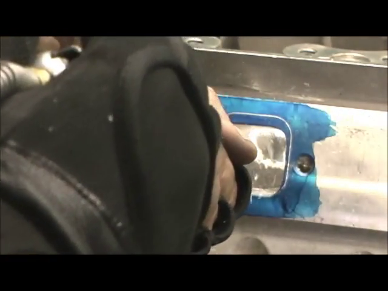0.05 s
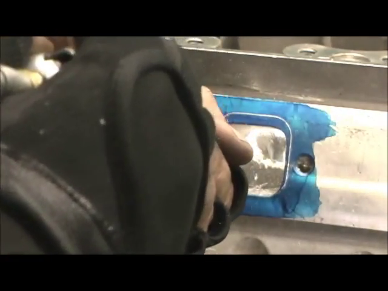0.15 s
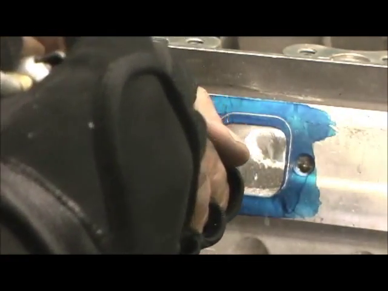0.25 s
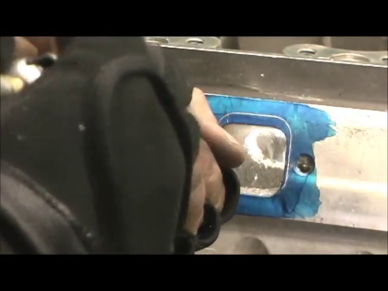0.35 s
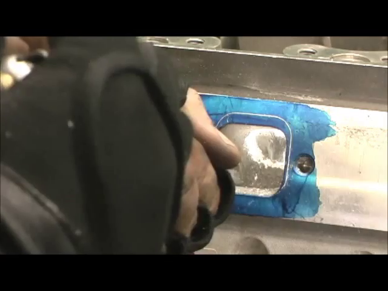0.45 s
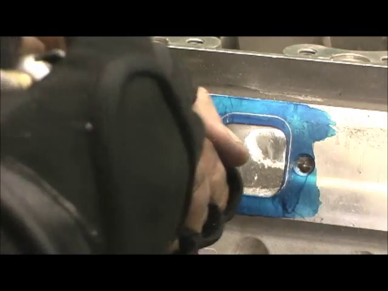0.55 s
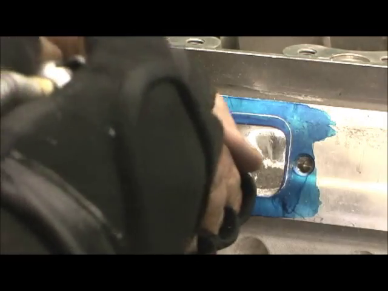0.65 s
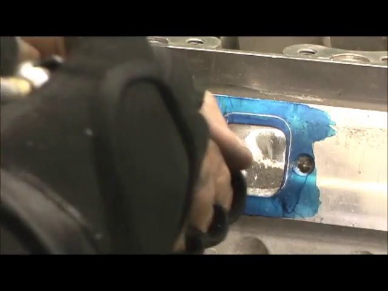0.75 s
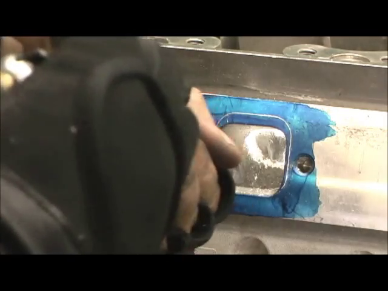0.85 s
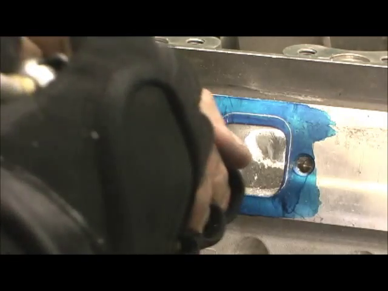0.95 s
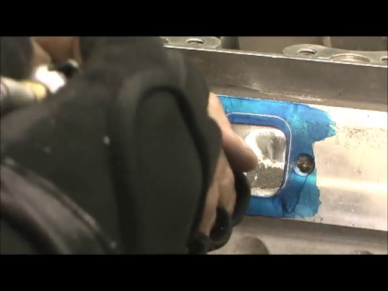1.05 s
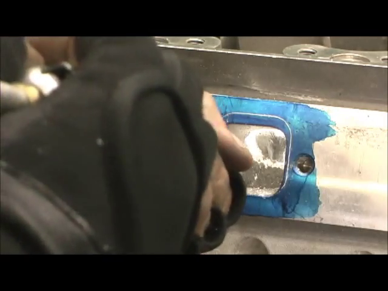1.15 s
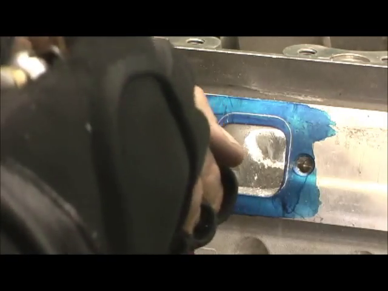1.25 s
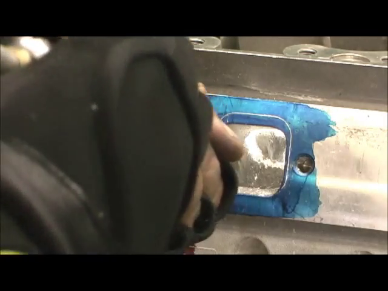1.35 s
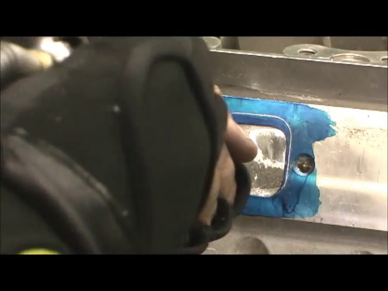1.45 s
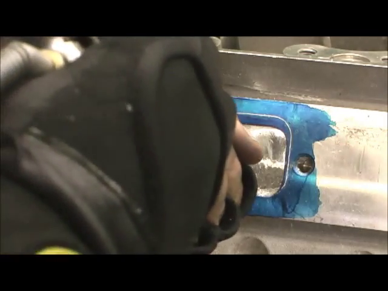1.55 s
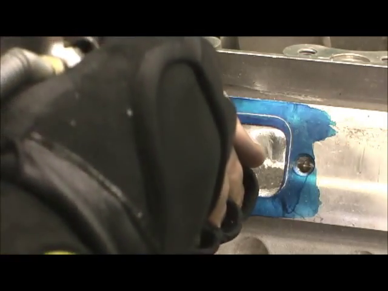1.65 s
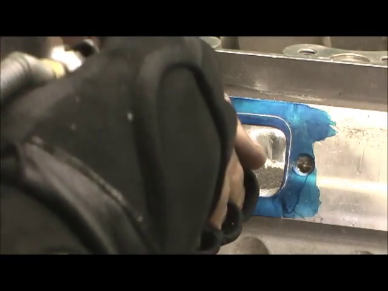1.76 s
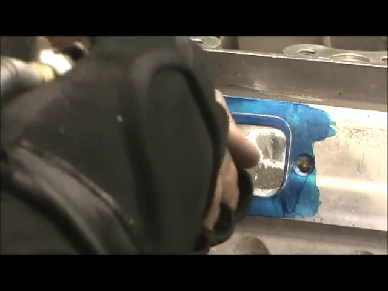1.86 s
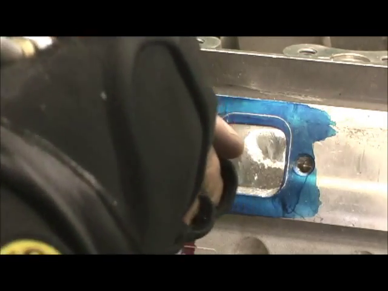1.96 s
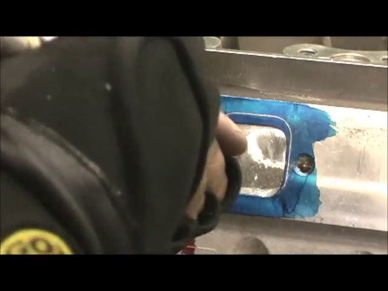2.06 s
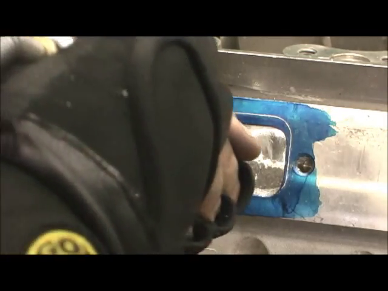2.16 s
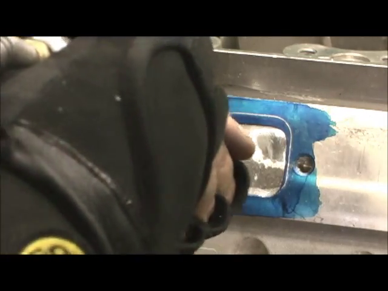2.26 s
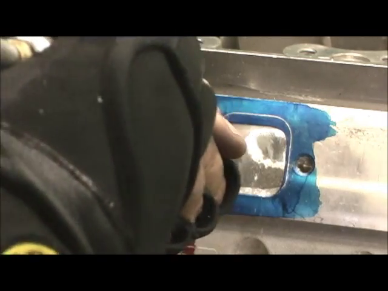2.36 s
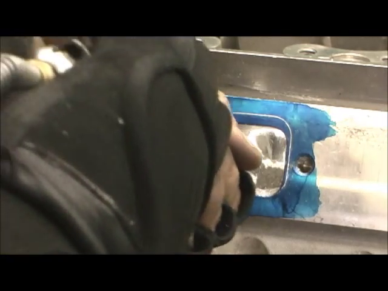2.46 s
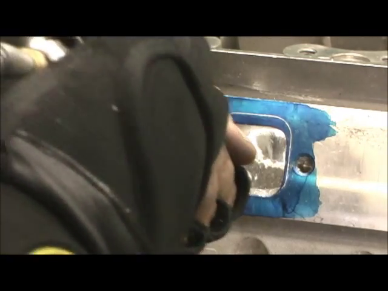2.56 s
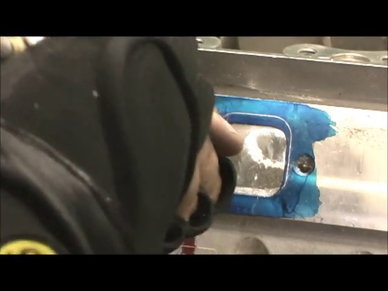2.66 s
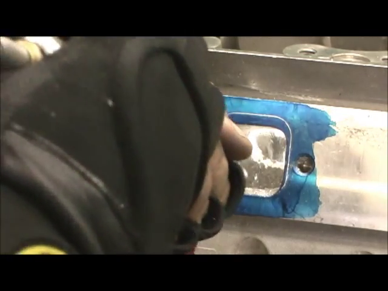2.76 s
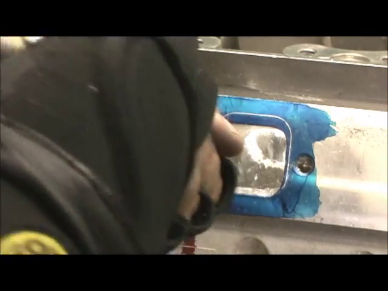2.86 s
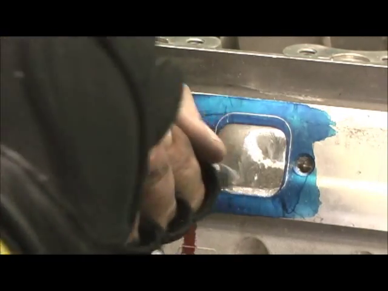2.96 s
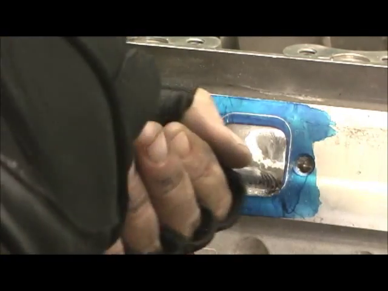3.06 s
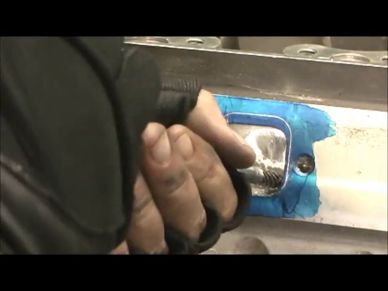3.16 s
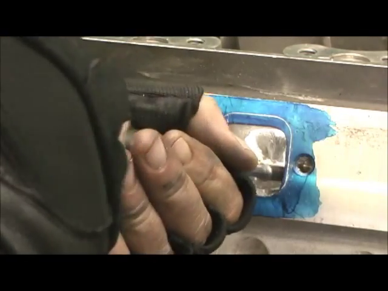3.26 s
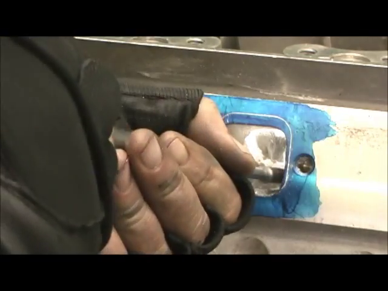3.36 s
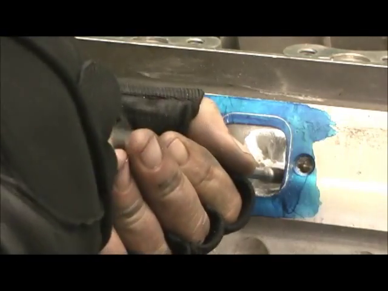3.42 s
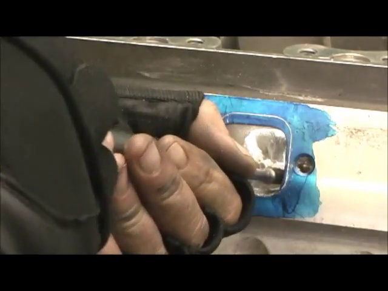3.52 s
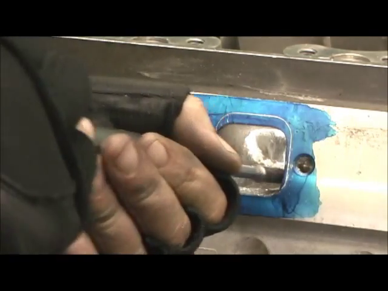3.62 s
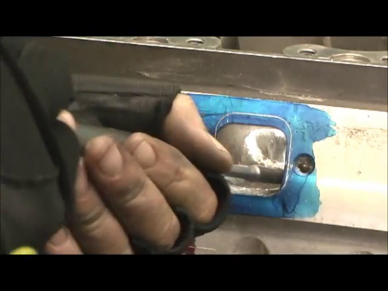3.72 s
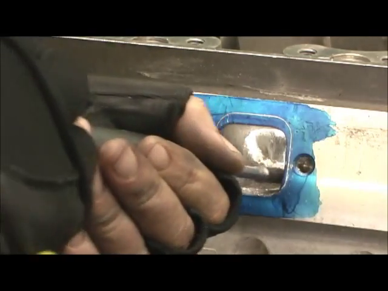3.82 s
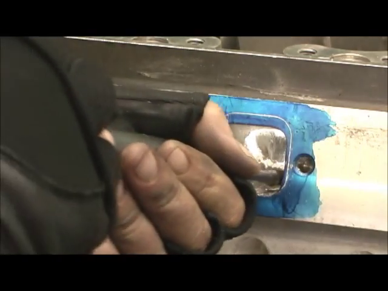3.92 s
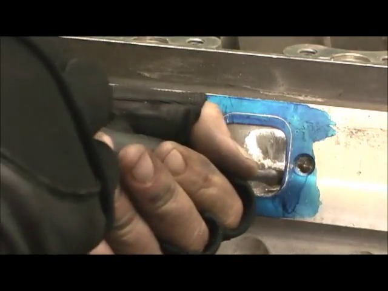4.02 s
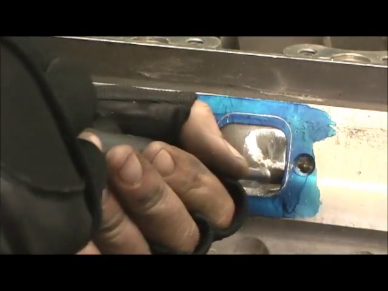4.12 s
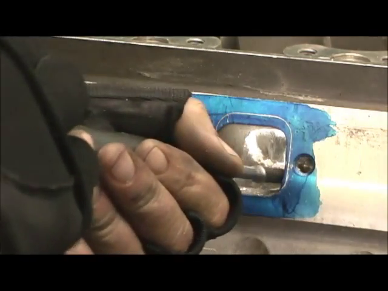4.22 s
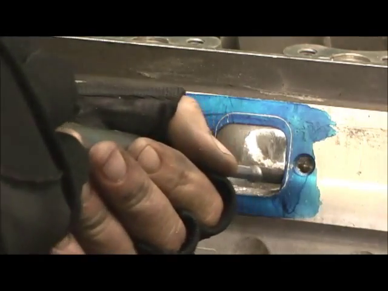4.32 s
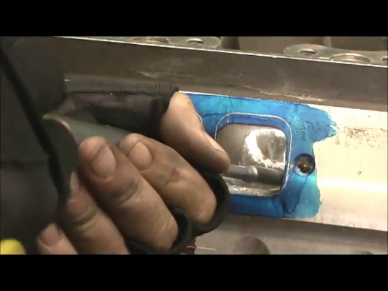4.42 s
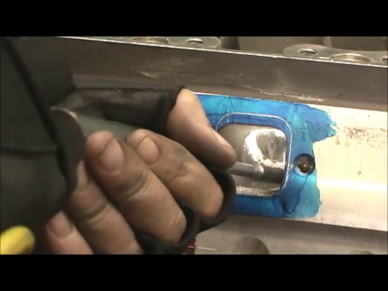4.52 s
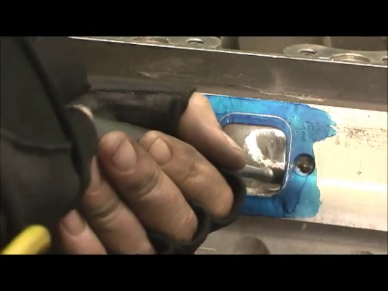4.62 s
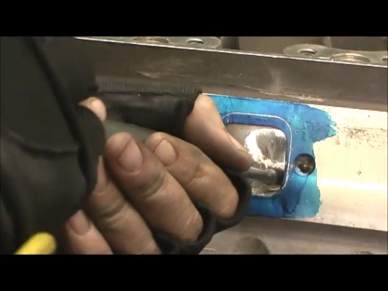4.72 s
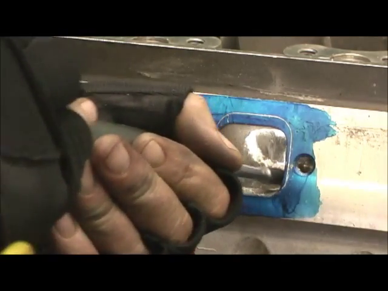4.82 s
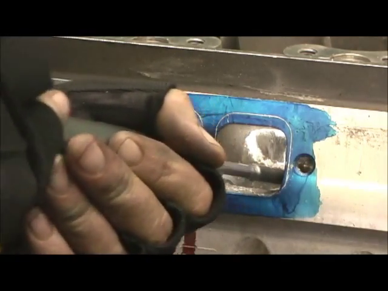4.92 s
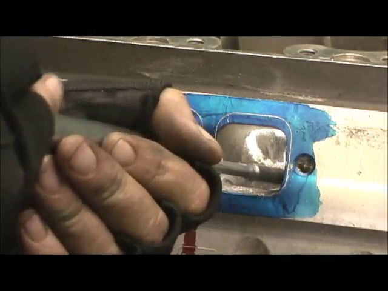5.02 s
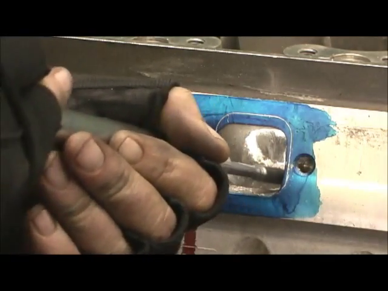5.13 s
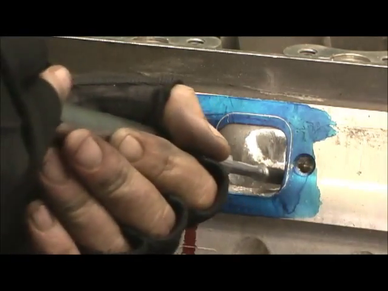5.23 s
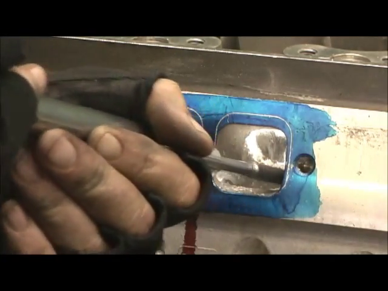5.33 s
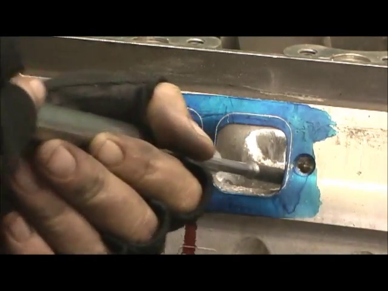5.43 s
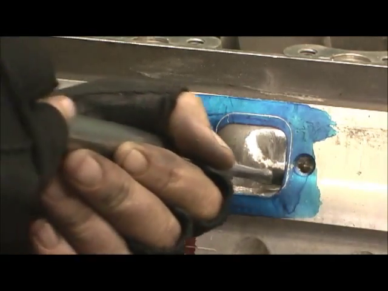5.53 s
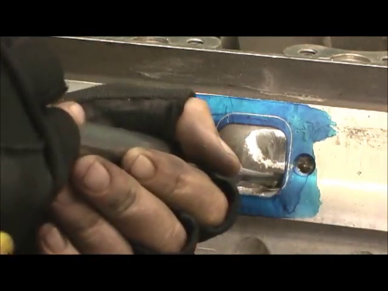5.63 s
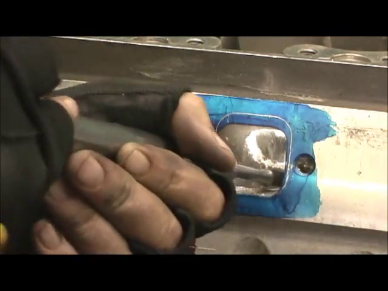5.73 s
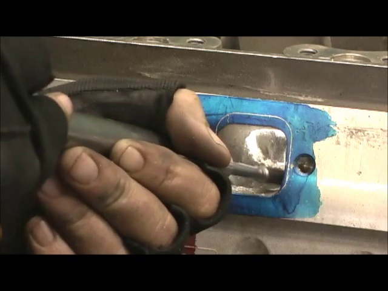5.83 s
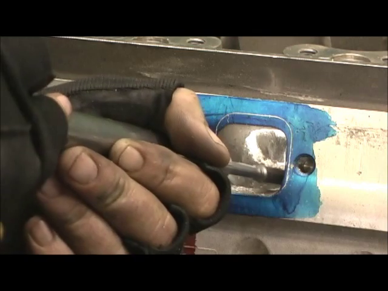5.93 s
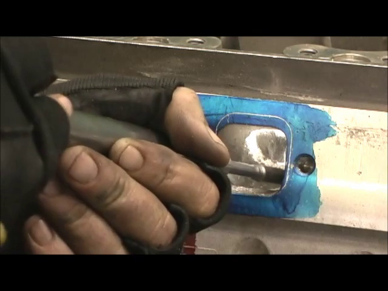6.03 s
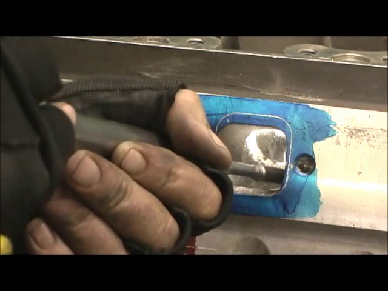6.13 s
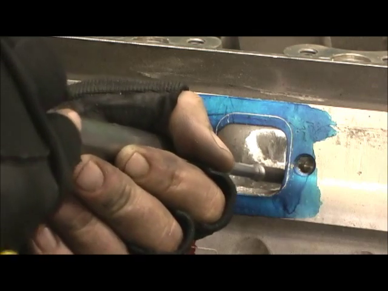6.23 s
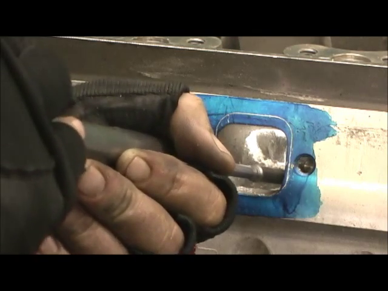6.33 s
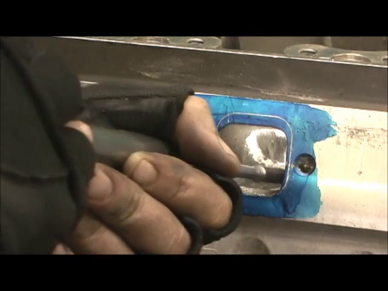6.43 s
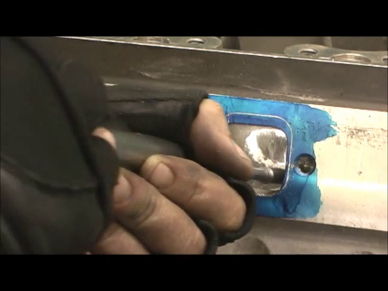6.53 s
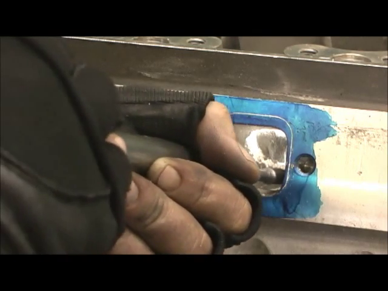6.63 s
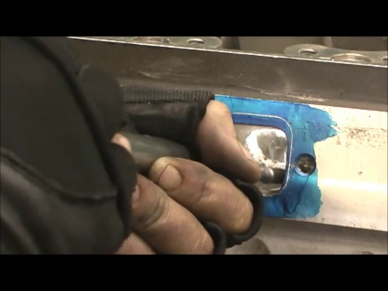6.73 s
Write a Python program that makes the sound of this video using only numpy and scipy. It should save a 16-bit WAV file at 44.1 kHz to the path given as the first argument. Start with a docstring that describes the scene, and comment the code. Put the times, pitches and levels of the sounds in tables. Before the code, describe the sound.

A handheld air grinder carves metal with a wavering whine, hiss and gritty chatter, cutting out for a moment and restarting.

```python
"""In a workshop, a five-vane air grinder cuts aluminium inside a heavy casting.
The shaft and vanes sing at a speed that sags under load. The burr throws crackling chips, its chatter
rings the modes of the casting, and the turbulent exhaust hisses. Near 3 s the tool stalls, winds down
and spins up again in a new grip. A machine hums far off, and a low rumble comes and goes."""
import sys
import numpy as np
from scipy import signal
from scipy.fft import rfft, irfft, next_fast_len
from scipy.io import wavfile

SR = 44100
rng = np.random.default_rng(int(sys.argv[2]) if len(sys.argv) > 2 else 0)


def generate_wav(sig):
    """Save sig (samples, or channels by samples) to the path in sys.argv[1] as 16-bit PCM at SR."""
    pcm = np.round(np.clip(np.atleast_2d(sig).T, -1, 1) * 32767).astype(np.int16)
    wavfile.write(sys.argv[1], SR, pcm)


N = 298998
TIME = np.arange(N) / SR
PAD = next_fast_len(N + SR)
BIN_HZ = np.maximum(np.arange(PAD // 2 + 1) * SR / PAD, 1)
VANES = 5
STALL_S, REGRIP_S, VALVE_CRACK_S, SPIN_UP_S, FULL_AIR_S = 2.887, 3.1, 3.245, 3.249, 3.256


def from_db(db):
    """Amplitude ratio of a level in decibels."""
    return 10 ** (np.asarray(db) / 20)


def rms_one(x):
    """Normalisation to unit rms."""
    return x / np.sqrt(np.mean(x ** 2) + 1e-20)


def in_time(rows):
    """Linear interpolation of timed rows: one curve for each column after the first."""
    times, *columns = np.transpose(rows)
    return [np.interp(TIME, times, column) for column in columns]


def over_bins(points):
    """Interpolation in log frequency, giving a value at every FFT bin."""
    hz, value = np.transpose(points)
    return np.interp(np.log(BIN_HZ), np.log(hz), value)


def coloured(x, spectrum):
    """Spectral shaping of a broadband signal, at unit rms."""
    return rms_one(irfft(rfft(x, PAD) * from_db(over_bins(spectrum)), PAD)[..., :N])


def drift(rate_hz):
    """Slow random fluctuation: low-passed noise of unit rms."""
    r = np.exp(-80 * np.pi * rate_hz / SR)
    slow = signal.lfilter([1], [1, -2 * r, r * r], rng.standard_normal(N // 40 + 2002))[2000:]
    return np.interp(np.arange(N) / 40, np.arange(len(slow)), rms_one(slow))


def resonate(x, hz, width_hz):
    """A damped resonator that preserves the power of white noise."""
    r = np.exp(-np.pi * width_hz / SR)
    b = np.sqrt((1 - r * r) / 2) * np.array([1, 0, -1])
    return signal.lfilter(b, [1, -2 * r * np.cos(2 * np.pi * hz / SR), r * r], x)


def shot_noise(per_s, spread_db):
    """Shot noise: two independent streams of dense clicks of uneven size."""
    sizes = from_db(spread_db * np.minimum(rng.exponential(1, (2, N)), 5))
    signs = rng.choice([-1, 1], (2, N))
    return rms_one(sizes * signs * (rng.random((2, N)) < per_s / SR))


def swells(rows):
    """A sum of Gaussian level changes in dB."""
    return sum(db * np.exp(-(2 * (TIME - s) / length) ** 2) for s, db, length in rows)


def by_grip(first, second):
    """A step from one value to another as the grip changes."""
    return np.where(TIME > REGRIP_S, second, first)


def air_supply(fall_db_per_s, creep_db_per_s, off_db, kick_db=0, crack_db=-14):
    """Throttling, in dB: a fall at the stall, a creep as the valve cracks, a snap to full air."""
    snap_db_per_s, kick_s = 2000, 0.048
    since_full = TIME - FULL_AIR_S
    fall = np.maximum(-fall_db_per_s * np.maximum(TIME - STALL_S, 0), off_db)
    creep = crack_db + creep_db_per_s * np.minimum(TIME - VALVE_CRACK_S, 0)
    snap = kick_db + snap_db_per_s * since_full
    kick = kick_db * np.exp(-np.maximum(since_full, 0) / kick_s)
    return np.maximum(fall, np.where(since_full < 0, np.maximum(snap, creep), kick))


def shaft_speed():
    """Rotation rate in Hz: it sags under load, falls steadily in the stall and recovers in an S-curve."""
    # Each row: time in seconds, working speed in Hz.
    speeds = [(0, 254), (.08, 262), (.17, 270), (.38, 274), (.47, 272), (.58, 282), (.66, 268), (.76, 246),
              (.86, 260), (.92, 261), (.98, 274), (1.08, 262), (1.17, 262), (1.29, 274), (1.4, 267),
              (1.57, 249), (1.78, 252), (1.89, 250), (1.96, 258), (2.1, 265), (2.25, 237), (2.32, 242),
              (2.38, 243), (2.43, 249), (2.6, 228), (2.7, 230), (2.77, 235), (2.88, 222), (3.3, 322),
              (3.42, 321), (3.53, 311), (3.6, 301), (3.85, 307), (3.93, 303), (4.1, 290), (4.33, 298),
              (4.5, 305), (4.77, 303), (4.86, 297), (5.03, 311), (5.15, 319), (5.22, 320), (5.29, 313),
              (5.4, 319), (5.57, 313), (5.63, 303), (5.8, 305), (6.05, 302), (6.2, 295), (6.35, 293),
              (6.45, 295), (6.55, 293), (6.65, 282), (6.78, 277)]
    spin_down_hz_per_s, spin_up_lag_s, idle_hz = 2450, .025, 20
    working_hz, = in_time(speeds)
    held_hz = np.interp(np.minimum(TIME, STALL_S), *np.transpose(speeds))
    down = held_hz - spin_down_hz_per_s * np.maximum(TIME - STALL_S, 0)
    up = working_hz * (1 - np.exp(-np.maximum(TIME - SPIN_UP_S, 0) / spin_up_lag_s)) ** 2
    return np.maximum(np.where(TIME < SPIN_UP_S, down, up), idle_hz)


def rotor_levels(shaft_hz):
    """Tone envelopes in dB follow the air supply; the vanes bark as the rotor winds down and up."""
    # Each row: time in seconds, then base levels in dB of the shaft tone, harmonics 2-4 and vane tone.
    tone_levels = [(0, -47, -48, -36), (.2, -57, -49, -37), (.45, -59, -49, -35), (.6, -47, -46, -34),
                   (.7, -48, -50, -40), (.9, -46, -48, -30), (1.06, -52, -50, -40), (1.3, -51, -47, -32),
                   (1.6, -48, -52, -41), (1.85, -46, -51, -39), (2.07, -44, -49, -32),
                   (2.22, -47, -58, -45), (2.33, -45, -57, -33), (2.45, -43, -56, -30),
                   (2.56, -46, -60, -35), (2.7, -42, -55, -30), (2.8, -42, -54, -35), (2.88, -42, -54, -35),
                   (3.32, -40, -50, -35), (3.4, -52, -49, -32), (3.7, -54, -53, -37), (4.2, -52, -49, -36),
                   (4.45, -55, -55, -48), (4.7, -64, -54, -36), (4.93, -58, -56, -46),
                   (5.05, -47, -49, -35), (5.6, -47, -49, -36), (5.8, -66, -56, -37), (6.1, -65, -62, -41),
                   (6.25, -57, -48, -37), (6.57, -54, -51, -41), (6.78, -53, -46, -40)]
    # Each row: time in seconds, nominal peak in dB, rise and fall in dB per second.
    barks = [(2.902, -12, 3000, 480), (3.281, -15.5, 300, 900)]
    throb_hz, throb_db = 80, 3
    supply_db = air_supply(fall_db_per_s=700, creep_db_per_s=6000, off_db=-36)
    shaft_db, harmonics_db, vane_db = in_time(tone_levels)
    vane_db = vane_db + 0.6 * drift(3.9) + supply_db
    slow_loss_db = 16 * np.maximum(np.log2(75 / shaft_hz), 0)   # barks fade below a 75 Hz shaft speed
    for s, peak_db, rise, fall in barks:
        bark_db = peak_db + np.minimum(rise * (TIME - s), fall * (s - TIME)) - slow_loss_db
        throb = throb_db * np.cos(2 * np.pi * throb_hz * (TIME - s))
        vane_db = np.maximum(vane_db, bark_db + throb)
    return shaft_db + supply_db, harmonics_db + supply_db, vane_db


def rotor(shaft_hz, shaft_db, harmonics_db, vane_db):
    """Periodic forcing gives shaft harmonics and a vane-passing tone; also returns the shaft angle."""
    muffler_hz, muffler_db_per_octave = 900, 22
    jitter_hz = .0042 * shaft_hz * drift(30) + 1.6 * drift(120)
    angle = 2 * np.pi * np.cumsum(shaft_hz + jitter_hz) / SR
    tones = from_db(shaft_db + 2.5 * drift(30)) * np.sin(angle)
    for order in (2, 3, 4):
        level_db = harmonics_db + 3.0 * drift(5.8) + 3.7 * drift(33) + 1.6 * (order - 3.5)
        tones += from_db(level_db) * np.sin(order * angle + order ** 2)
    puffs = np.sin(VANES * angle)
    for order in (2, 3):   # overtones of the puffs peak as they cross the muffler's resonance
        octaves_off = np.abs(np.log2(order * VANES * shaft_hz / muffler_hz))
        resonant_db = 6 - 3 * order - muffler_db_per_octave * octaves_off
        overtone_db = np.maximum(resonant_db, -8 * order) + 3 * drift(60)
        puffs += from_db(overtone_db) * np.sin(order * VANES * angle + order)
    tones += from_db(vane_db + 2.0 * drift(40)) * puffs
    return np.sqrt(2) * tones, angle


def work_levels():
    """Envelopes in relative dB of chips, exhaust, exhaust top and chatter, gated by the air supply."""
    # The burr digs in. Each row: centre in seconds, swell in dB, length in seconds.
    bites = [(.62, 4, .09), (.77, 9, .11), (1.17, 6, .16), (1.6, 5, .1), (1.87, 7, .08), (2.06, 5, .08),
             (2.24, 8, .16), (2.53, 8, .2), (2.75, 5, .12), (2.85, 7, .07), (3.96, 2, .07), (4.15, 2, .3),
             (4.9, 4, .12), (5.38, 3, .08), (6.02, 4, .08), (6.28, 2, .08), (6.57, 2, .16)]
    # The hiss dips briefly. Each row: centre in seconds, change in dB, length in seconds.
    dips = [(1.94, -2, 0.095), (2.34, -3, 0.071), (4.43, -1.5, 0.038), (5.07, -1.5, 0.066)]
    # The exhaust's highest band. Each row: time in seconds, relative level in dB.
    top_levels = [(0, -35.5), (1.2, -36), (2.0, -33), (2.88, -38), (3.3, -26), (3.42, -32), (3.7, -35),
                  (4.5, -34.5), (5.1, -29.5), (5.7, -31), (6.3, -33.5), (6.78, -34)]
    # Chatter beneath the bites. Each row: time in seconds, relative level in dB.
    chatter_levels = [(0, -34.5), (.5, -37.5), (1.5, -36), (1.7, -39.5), (2.88, -38), (3.3, -37.5),
                      (3.7, -31.5), (4.0, -34), (4.45, -32.5), (4.7, -33.5), (5.15, -35.5), (5.4, -35),
                      (5.65, -37.5), (6.1, -36.5), (6.4, -35.5), (6.78, -32)]
    # Response of the four layers to the air. Each row: fall and creep in dB per second, then
    # kick at full air, wavering, level with the air off and level with the valve cracked, all in dB.
    responses = [(121, 600, 6.5, 0.5, -38, -5.5), (217, 550, -0.5, 0.58, -48, -21),
                 (400, 500, 1, 2.5, -49, -19), (124, 600, -1, 0.04, -40, -16)]
    bite_db, dip_db = swells(bites), swells(dips)
    chips_db = by_grip(-35.5, -33.5) + dip_db + 0.38 * bite_db
    exhaust_db = by_grip(-25, -25.5) + dip_db
    top_db = in_time(top_levels)[0] + dip_db
    chatter_db = in_time(chatter_levels)[0] + bite_db
    layers = chips_db, exhaust_db, top_db, chatter_db
    return [level + air_supply(fall, creep, off, kick, crack) + waver * drift(1.9)
            for level, (fall, creep, kick, waver, off, crack) in zip(layers, responses)]


def chips(angle, level_db):
    """Amplitude-modulated shot noise: chips crackle, and the burr bites harder once a turn."""
    # Chips heard through tool and port wall. Each row: frequency in Hz, relative level in dB.
    spectrum = [(40, -74), (130, -48), (180, -32), (240, -36), (310, -41), (430, -20), (520, -4), (700, -9),
                (1300, 0.5), (1440, 3), (1600, 3), (2400, 1), (3700, 0), (4000, 0), (6000, -11.5)]
    bite = (1 + .25 * np.sin(angle)) * from_db(drift(30))
    impacts = bite * shot_noise(per_s=9000, spread_db=-1.5)
    return from_db(level_db + 8.5) * coloured(impacts, spectrum)


def exhaust(angle, body_db, top_db):
    """Turbulence, gently chopped by the vanes, interferes with its echo off the shifting hand."""
    # The body of the hiss. Each row: frequency in Hz, relative level in dB.
    body_spectrum = [(3000, -29), (4900, -2.5), (6400, -1), (7700, 3), (9200, 3.5), (10500, 0.5),
                     (12000, -12.5), (14000, -49)]
    # Its highest band, with the same columns.
    top_spectrum = [(8000, -24), (10500, 3), (12000, 4.5), (14400, 3), (15700, -4)]
    echo_s, echo_db = .0009, -11
    chop = (1 + 0.16 * np.sin(VANES * angle)) * from_db(0.67 * drift(74))
    air = chop * shot_noise(per_s=16000, spread_db=-1.0)
    lag = np.round(echo_s * SR * (1 + .08 * drift(1.5))).astype(int)
    air = air + from_db(echo_db) * air[:, np.clip(np.arange(N) - lag, 0, N - 1)]
    body = from_db(body_db + 2.5) * coloured(air, body_spectrum)
    return body + from_db(top_db + 3.5) * coloured(air, top_spectrum)


def swish(exhaust_db):
    """Band noise on a gliding carrier: a bright patch slides as the hand moves round the exhaust."""
    # Each row: time in seconds, centre in Hz, level in dB relative to the exhaust envelope.
    path = [(0, 9000, -2.5), (.6, 9000, -4), (.8, 8900, -15), (1.6, 8600, -2), (2.9, 8000, -10),
            (4.4, 10500, -20), (4.7, 12700, 0), (5.0, 12500, -26), (5.7, 13400, -4), (6.2, 13300, -7),
            (6.6, 13000, -27)]
    width_hz = 1700
    centre_hz, relative_db = in_time(path)
    low_pass = signal.butter(2, width_hz / 2, fs=SR, output="sos")
    slow = signal.sosfilt(low_pass, rng.standard_normal((2, 2, N)))
    phase = 2 * np.pi * np.cumsum(centre_hz) / SR
    band = slow[0] * np.cos(phase) + slow[1] * np.sin(phase)
    return from_db(exhaust_db + relative_db) * rms_one(band)


def casting(exhaust_db, chatter_db):
    """Forced vibration: chatter drives the low modes, the whole tool the high; grip sets the balance."""
    # Natural frequencies in Hz, lower set and upper set; the first, 210 Hz, is a faint second hum in the second
    # grip rather than a mode of the casting.
    lower_hz = [210, 400, 830, 977, 1400, 1680, 2050, 2580, 2750, 2850, 2858, 2890, 3100, 3490, 3475, 4270,
                5238, 5762, 5965, 6140, 6897, 7120]
    upper_hz = [7487, 7592, 8013, 8159, 8319, 8427, 9086, 9903, 10315, 10570, 11010, 11125, 11290, 11480,
                11920, 12150]
    # The same modes. Each row: bandwidth in Hz, relative level in dB in the first and second grip.
    modes = [(40, -66, -54), (200, -70, -51), (90, -44, -44), (20, -49, -50), (120, -46, -40),
             (80, -36, -44), (900, -33, -46), (50, -40, -50), (45, -40, -50), (100, -41, -34),
             (20, -52, -37), (20, -52, -39), (200, -43, -41), (90, -41, -37), (16, -46, -36),
             (150, -48, -46), (22, -48, -45), (16, -45, -43), (16, -44, -48), (28, -48, -46),
             (27, -39, -35), (30, -44, -48), (16, -34, -38), (25, -36, -33), (16, -39, -39), (16, -37, -43),
             (16, -38, -44), (16, -46, -43), (25, -44, -43), (50, -44, -42), (22, -47, -42), (25, -48, -47),
             (18, -45, -48), (16, -43, -46), (25, -47, -46), (22, -48, -52), (25, -52, -49), (60, -48, -49)]
    chatter_top_hz, squeal_hz, low_cut_hz = 3600, 5762, 195
    shake = shot_noise(per_s=7000, spread_db=2.5)
    ringing = np.zeros((2, N))
    for hz, (width_hz, first_db, second_db) in zip(lower_hz + upper_hz, modes):
        force_db = chatter_db + 32.5 if hz < chatter_top_hz else exhaust_db + 29.5
        level_db = force_db + by_grip(first_db, second_db) + 1.8 * drift(4)
        if hz == squeal_hz:   # this mode squeals out twice
            level_db += swells([(3.08, 14, .28), (6.0, 5, .35)])
        ringing += resonate(shake * from_db(level_db), hz, width_hz)
    # The ringing carries no deep bass: everything below about 195 Hz is removed.
    return signal.sosfilt(signal.butter(4, low_cut_hz, "high", fs=SR, output="sos"), ringing)


def workshop():
    """Ambient noise: broadband room tone, with narrow resonances for a machine's hum and a rumble."""
    # Room tone. Each row: frequency in Hz, relative level in dB.
    spectrum = [(40, -44), (145, -34), (190, -20), (320, -19), (450, -3), (700, 0), (1300, -10),
                (5000, -31), (15000, -37)]
    # The distant machine. Each row: frequency in Hz, bandwidth in Hz, level between swells in dB.
    hum_bands = [(112, 12, -72), (232, 14, -55), (680, 20, -66)]
    # The rumble swells, the hum less so. Each row: centre in seconds, rise in dB, length in seconds.
    rumble_swells = [(.9, 18, 0.18), (1.3, 19, 0.19), (2.07, 10, 0.19), (2.66, 12, 0.16),
                     (3.08, 20.5, 0.73), (4.05, 13, 0.21), (5.75, 6, 0.28)]
    rumble_hz, width_hz = 112, 17
    swell_db = swells(rumble_swells)
    white = rng.standard_normal((2, N))
    room_tone = from_db(-52.5) * coloured(white, spectrum)
    hum = sum(from_db(db) * resonate(white, hz, width) for hz, width, db in hum_bands)
    rumble = resonate(rng.standard_normal((2, N)), rumble_hz, width_hz)
    rumble = rms_one(resonate(rumble, rumble_hz, 2 * width_hz))
    return room_tone + from_db(0.49 * swell_db) * hum + from_db(-78 + swell_db) * rumble


def reverberation(x, t60_s):
    """Repeated reflection: ten feedback delays in parallel make a decaying tail."""
    tail = 0
    for k, lag_s in enumerate(rng.uniform(.02, .05, 10)):
        round_trip = from_db(-60 * lag_s / t60_s) * np.exp(-2j * np.pi * BIN_HZ * lag_s)
        tail += (-1) ** k * (1 / (1 - round_trip) - 1)
    return irfft(rfft(x, PAD) * tail, PAD)[..., :N]


def valve_thump():
    """A damped oscillation from the first gulp of air as the valve reopens."""
    start_s, hz, width_hz = 3.251, 280, 90
    age = np.maximum(TIME - start_s, 0)
    return from_db(-17) * np.sin(2 * np.pi * hz * age) * np.exp(-np.pi * width_hz * age)


def stereo(mid_side):
    """Partial coherence: two nearby points receive nearly the same bass but different treble."""
    # Each row: frequency in Hz, coherence of left and right from 0 to 1.
    coherences = [(60, .9995), (130, .998), (260, .997), (700, .9975), (1100, .9998), (2500, .9998),
                  (5300, .998), (6000, .7), (6800, .95), (7800, .95), (8600, .87), (9500, .73),
                  (11200, .55), (12100, .33), (14000, .55), (15500, .55)]
    # Each row: frequency in Hz, level of left over right in dB.
    level_differences = [(5300, 0), (6000, -2.8), (6900, -1.2), (7750, -1.6), (9500, -3.4), (10400, -2.9),
                         (12000, 2.3), (13000, 4), (15500, 2.3)]
    # Each row: frequency in Hz, phase lead of the left in radians.
    phase_leads = [(8000, 0), (10300, .8), (11500, .4), (13000, .9), (15500, .5)]
    mid, side = rfft(mid_side, PAD)
    coherence = over_bins(coherences)
    mid *= np.sqrt((1 + coherence) / 2)
    side *= np.sqrt((1 - coherence) / 2)
    lean = from_db(over_bins(level_differences) / 2) * np.exp(.5j * over_bins(phase_leads))
    return irfft([(mid + side) * lean, (mid - side) / lean], PAD)[:, :N]


def comb(x):
    """Comb filtering: narrow, evenly spaced notches colour the sound."""
    # Each row: spacing in Hz, width in Hz, depth from 0 to 1, lower and upper limit in Hz.
    notches = [(600, 24, .5, 300, 16000), (300, 24, .45, 450, 4050)]
    gain = 1
    for spacing_hz, width_hz, depth, low_hz, top_hz in notches:
        delay = np.exp(-2j * np.pi * BIN_HZ / spacing_hz)
        feedback = np.exp(-np.pi * width_hz / spacing_hz)
        notch = 1 - depth * (1 - feedback) / (1 - feedback * delay)
        gain = gain * np.where((BIN_HZ > low_hz) & (BIN_HZ < top_hz), notch, 1)
    return irfft(rfft(x, PAD) * gain, PAD)[:, :N]


def scene():
    """Superposition of the tool and its reverberation, chips, hiss, ringing casting and workshop."""
    shaft_hz = shaft_speed()
    tones, angle = rotor(shaft_hz, *rotor_levels(shaft_hz))
    chips_db, exhaust_db, top_db, chatter_db = work_levels()
    tool = tones + valve_thump()
    port = resonate(tool, hz=750, width_hz=750)   # the exhaust muffler's resonance colours what reaches the room
    tool += from_db(-23.5) * reverberation(port, t60_s=0.39)
    centred_tool = tool * [[1], [0]]   # all mid, no side
    hiss = exhaust(angle, exhaust_db, top_db) + swish(exhaust_db)
    return stereo(centred_tool + chips(angle, chips_db) + hiss
                  + casting(exhaust_db, chatter_db) + workshop())


def record(dry):
    """Filtering and soft saturation: comb notches, thinned bass, rounded peaks and a steep top cut."""
    low_cut_hz, top_cut_hz = 88, 15720
    thin = signal.sosfilt(signal.butter(4, low_cut_hz, "high", fs=SR, output="sos"), comb(dry))
    rounded = 1.5 * np.tanh(thin / 1.5)
    return signal.sosfilt(signal.ellip(12, .5, 60, top_cut_hz, fs=SR, output="sos"), rounded)


dry = scene()
out = record(dry)
generate_wav(out)
```